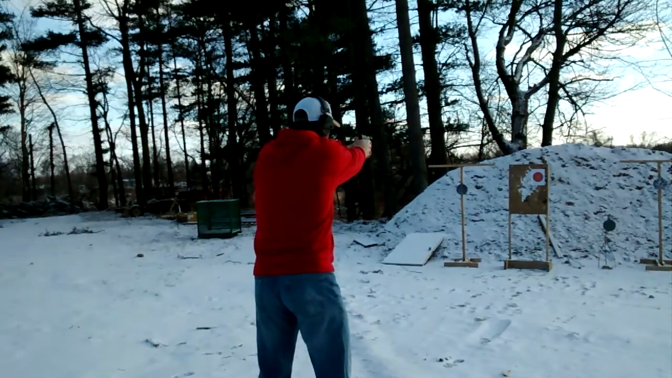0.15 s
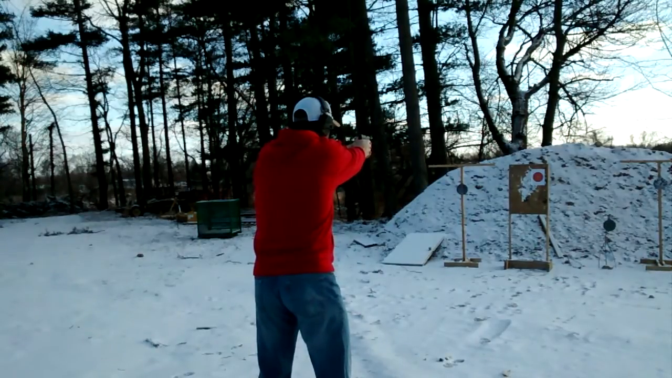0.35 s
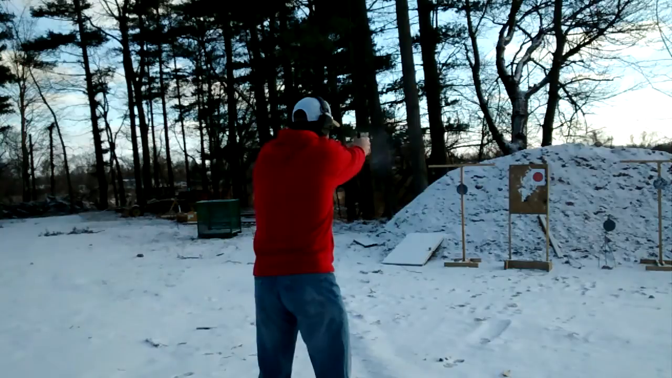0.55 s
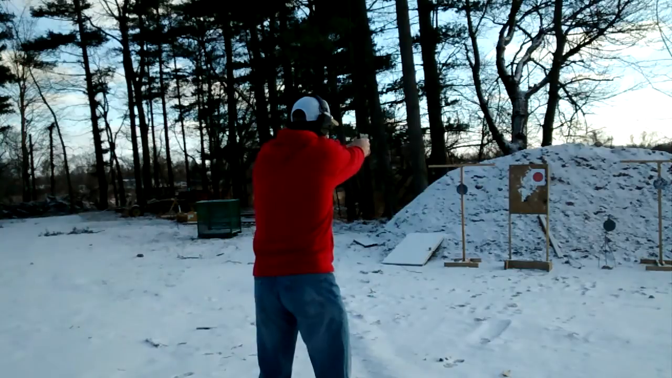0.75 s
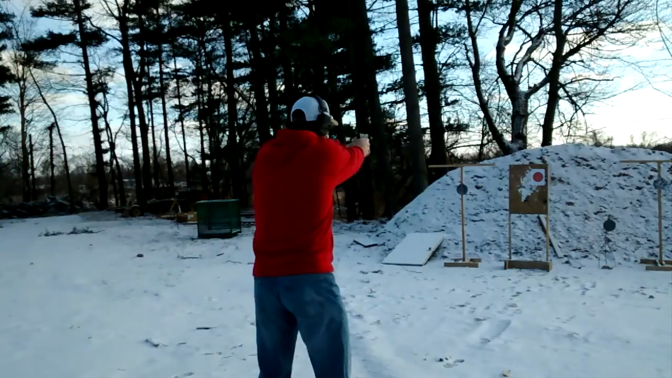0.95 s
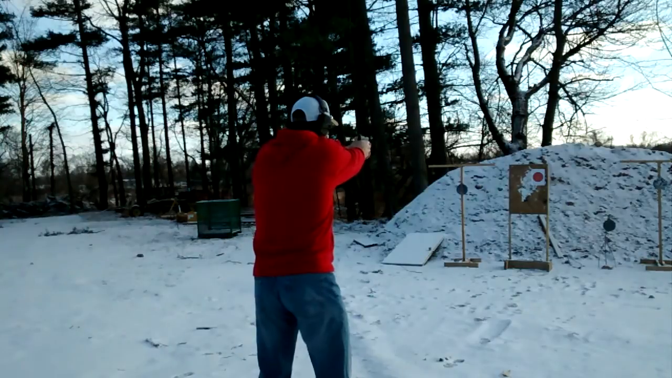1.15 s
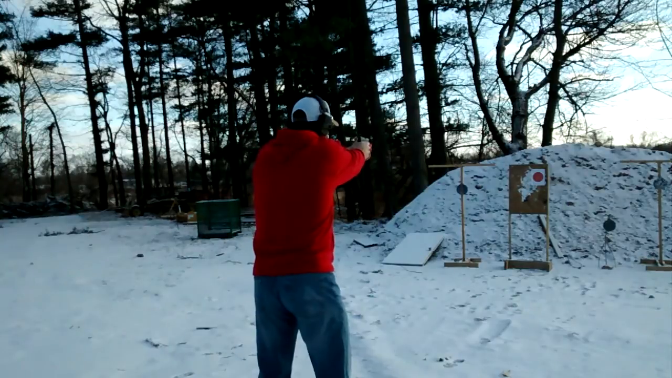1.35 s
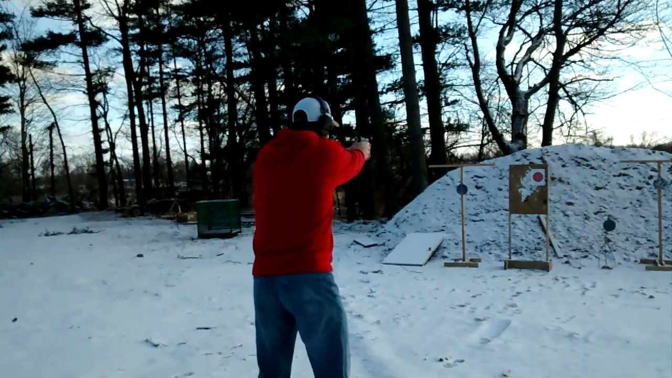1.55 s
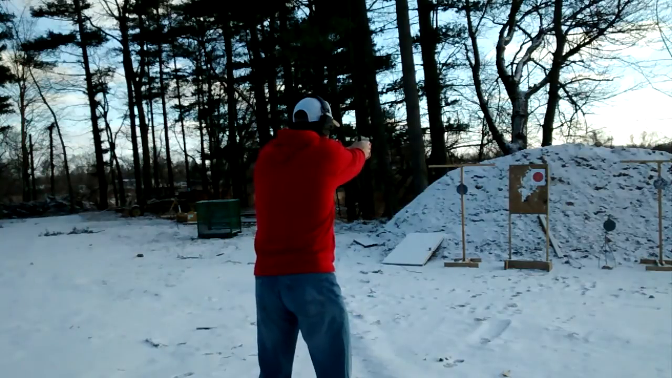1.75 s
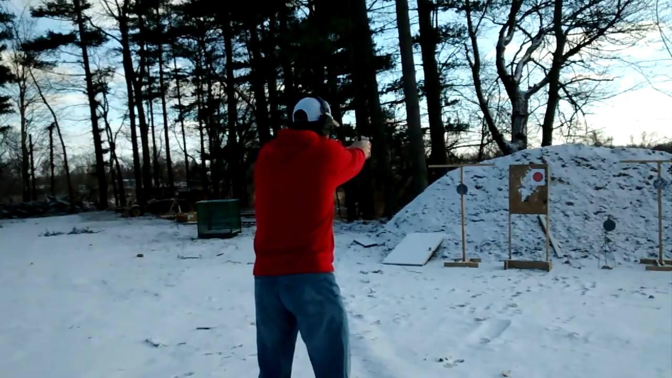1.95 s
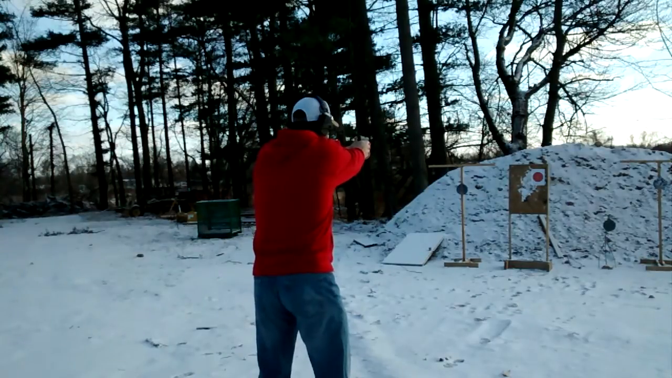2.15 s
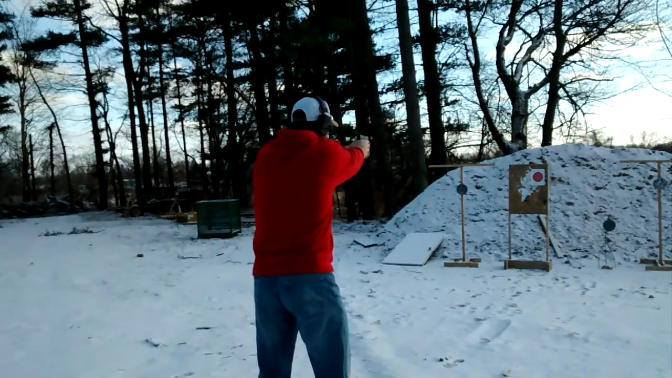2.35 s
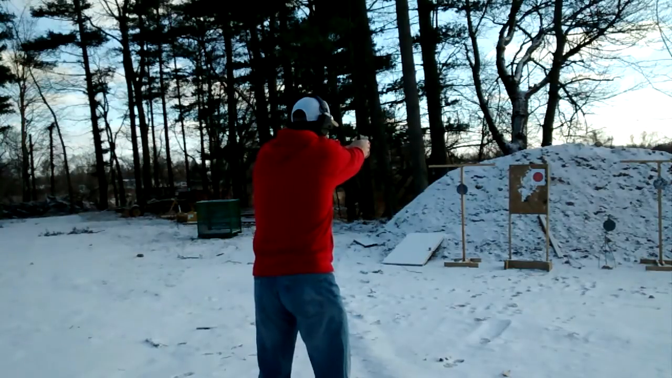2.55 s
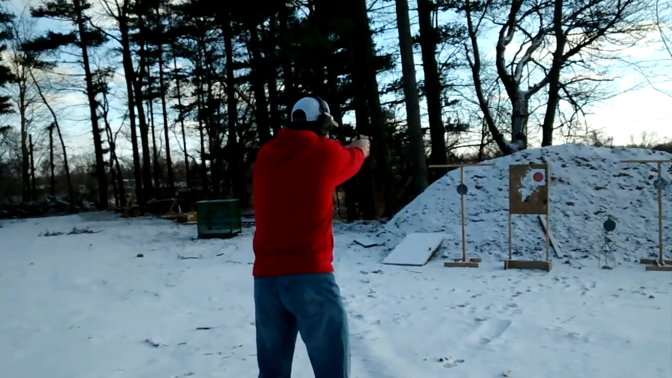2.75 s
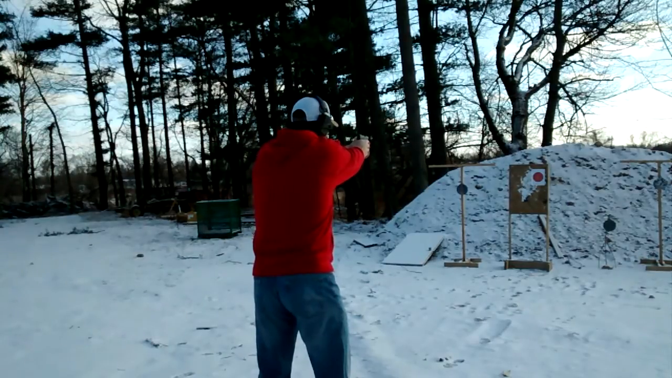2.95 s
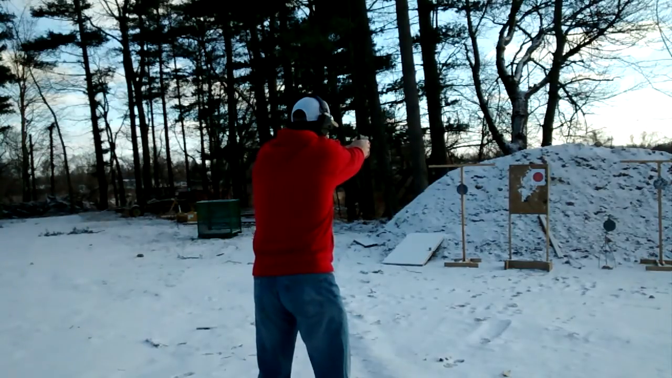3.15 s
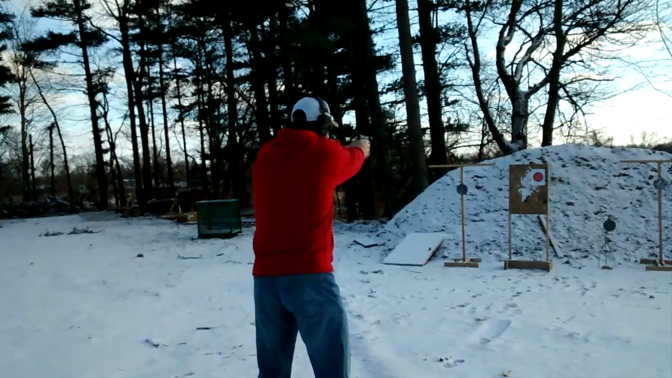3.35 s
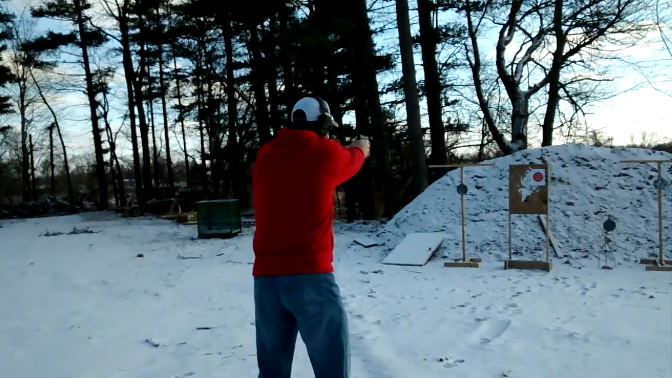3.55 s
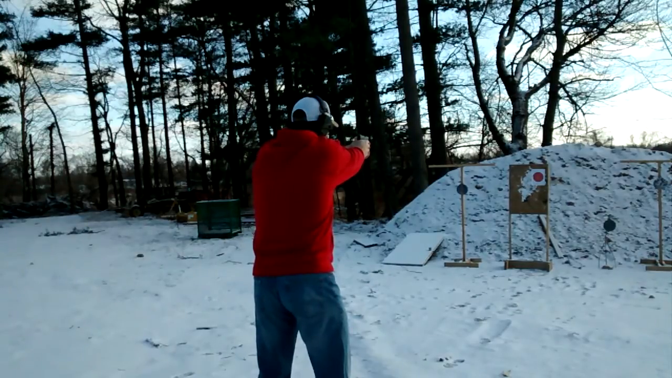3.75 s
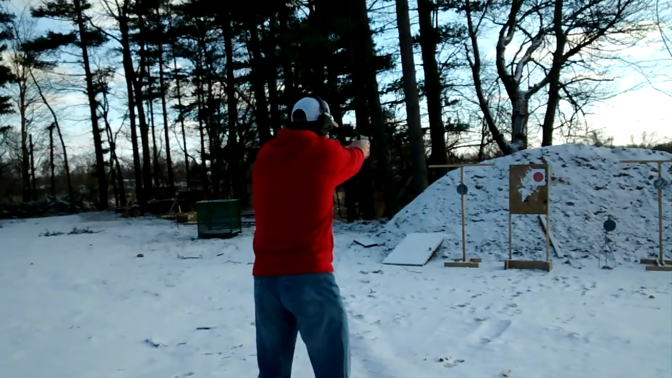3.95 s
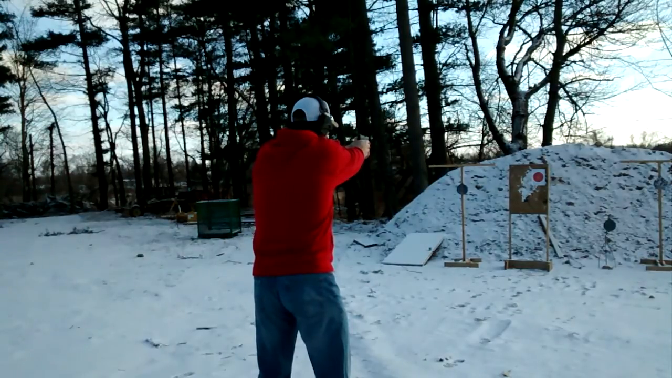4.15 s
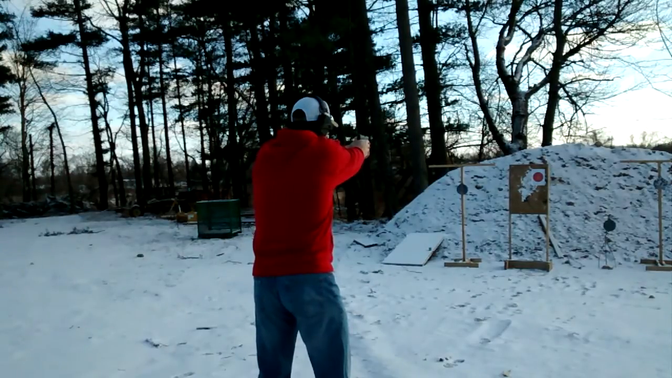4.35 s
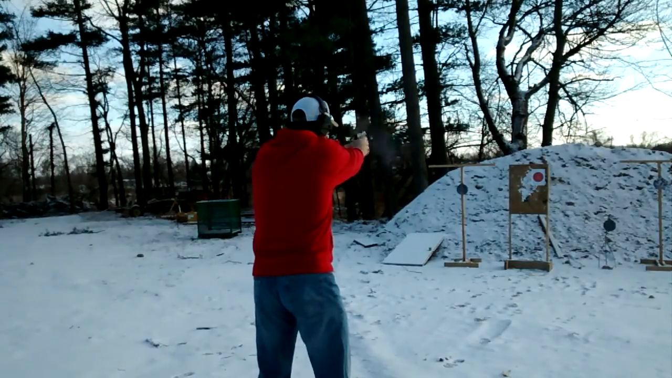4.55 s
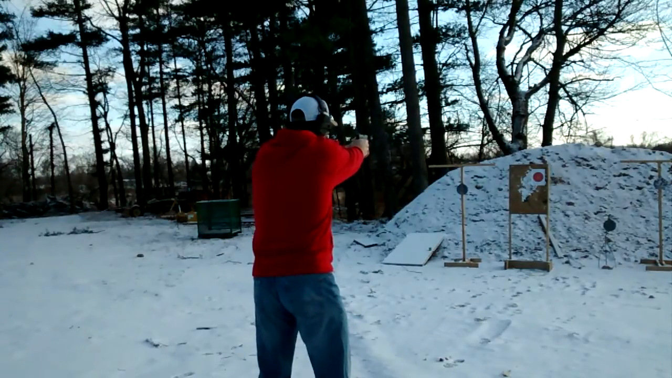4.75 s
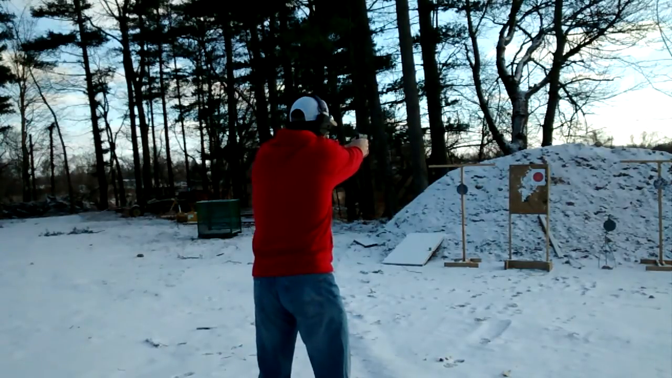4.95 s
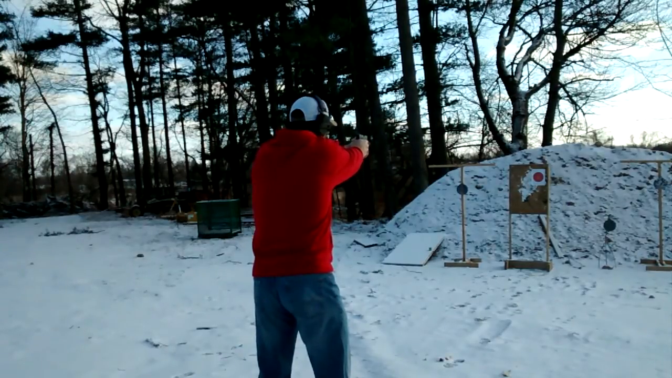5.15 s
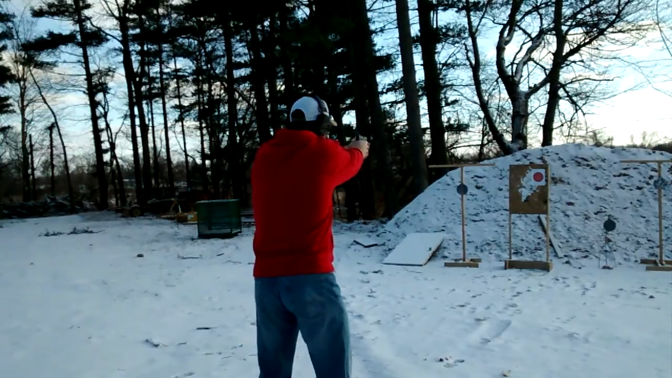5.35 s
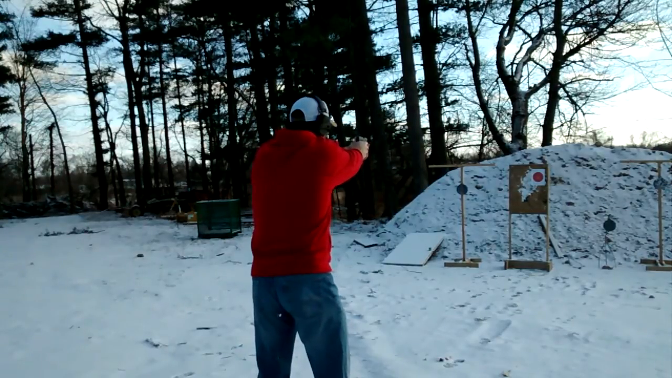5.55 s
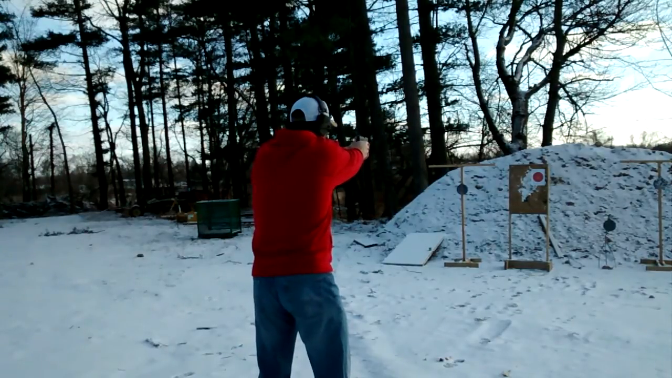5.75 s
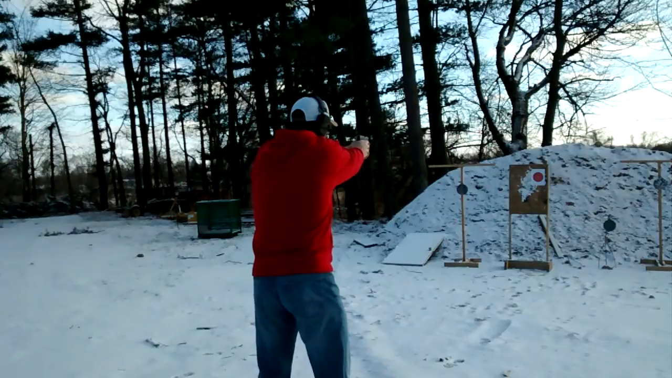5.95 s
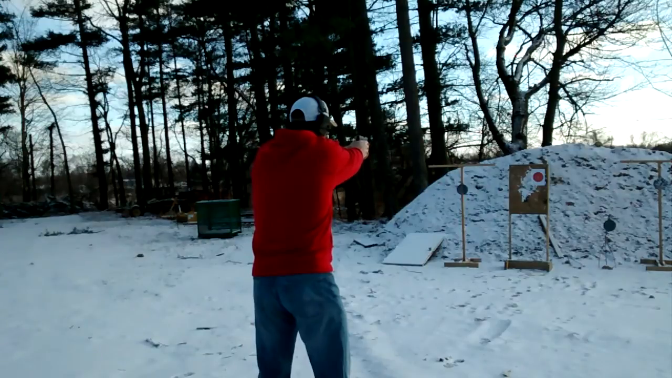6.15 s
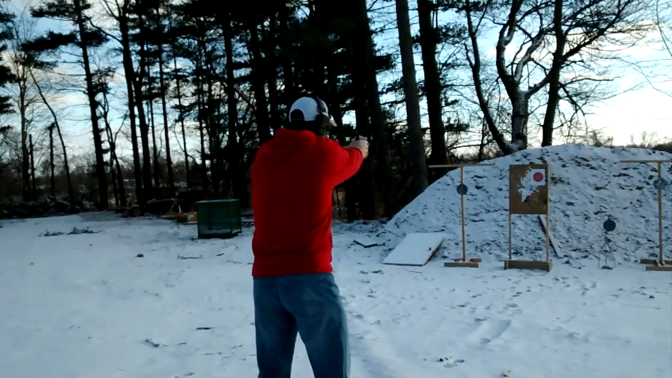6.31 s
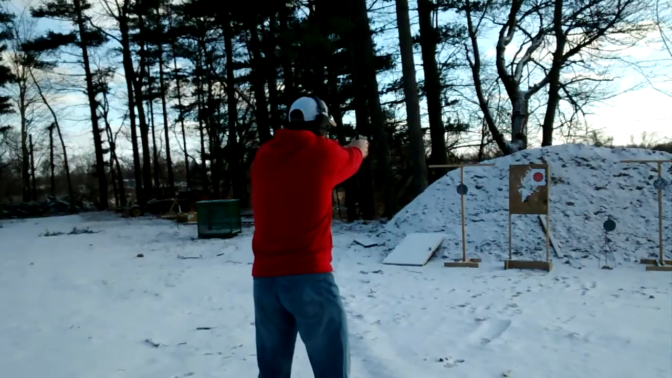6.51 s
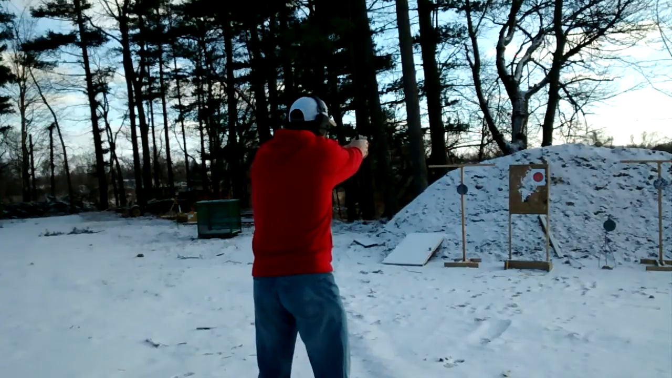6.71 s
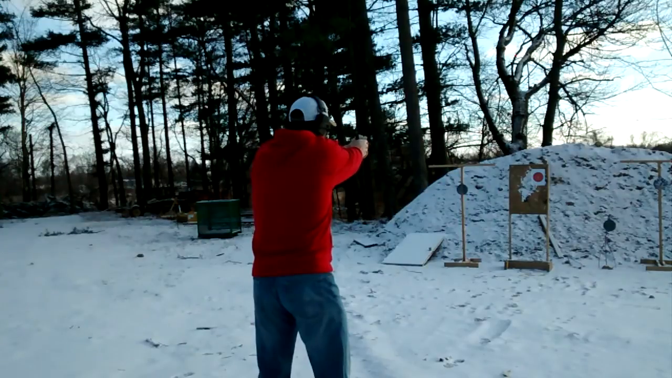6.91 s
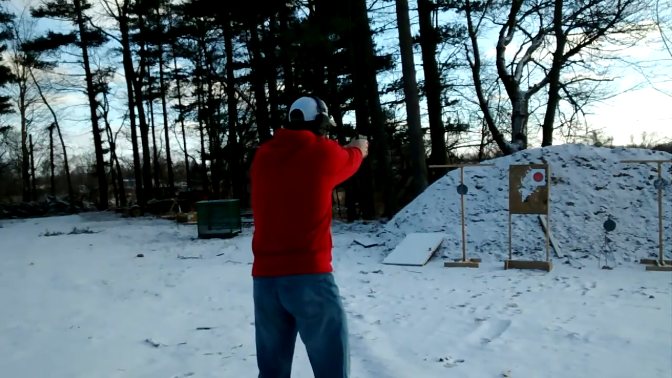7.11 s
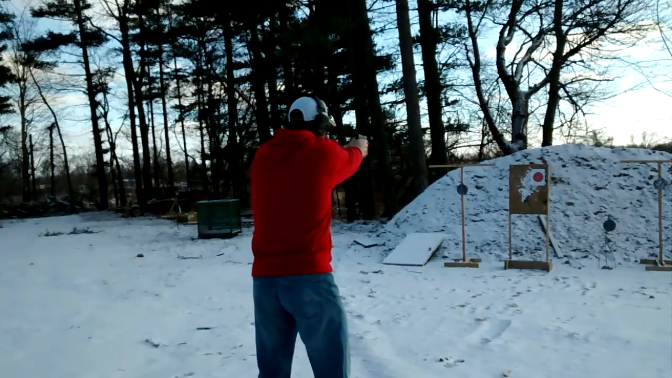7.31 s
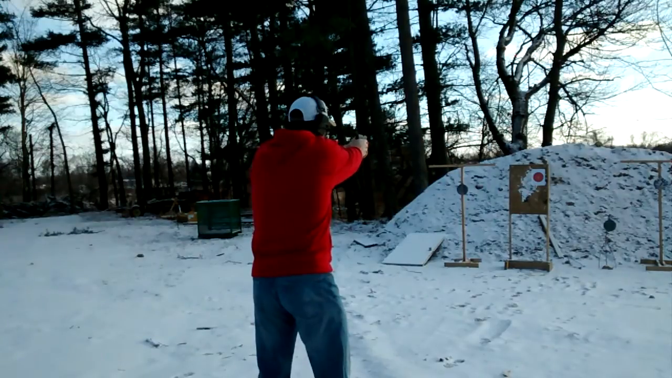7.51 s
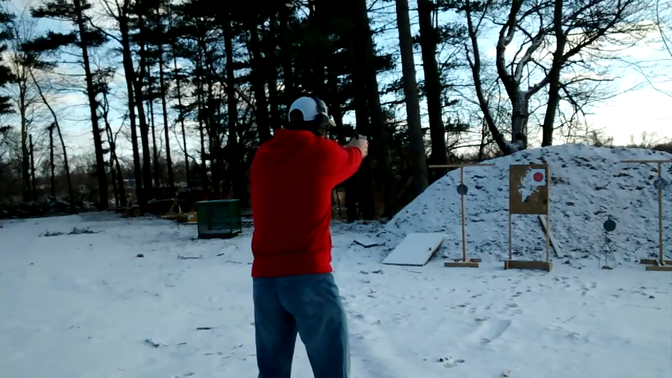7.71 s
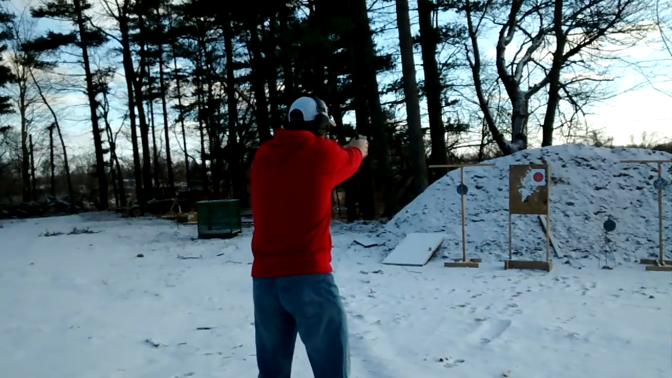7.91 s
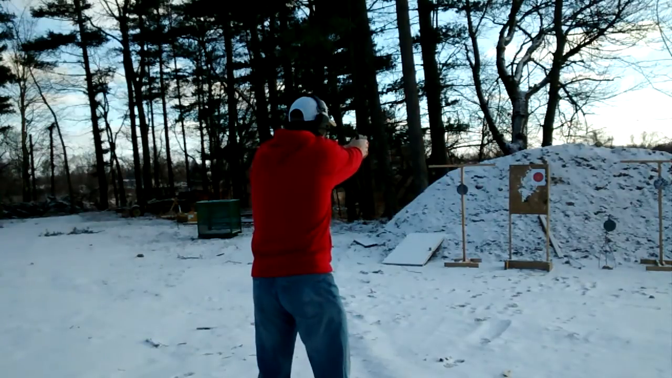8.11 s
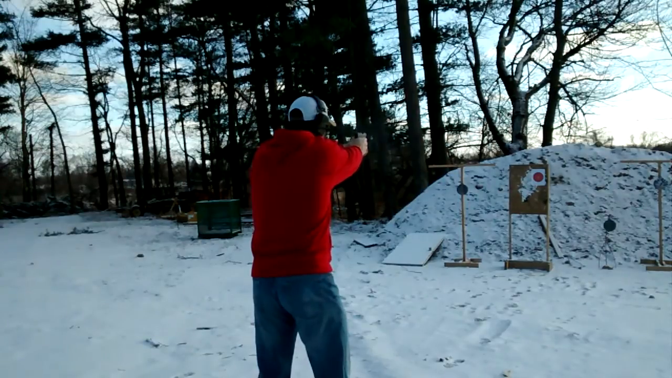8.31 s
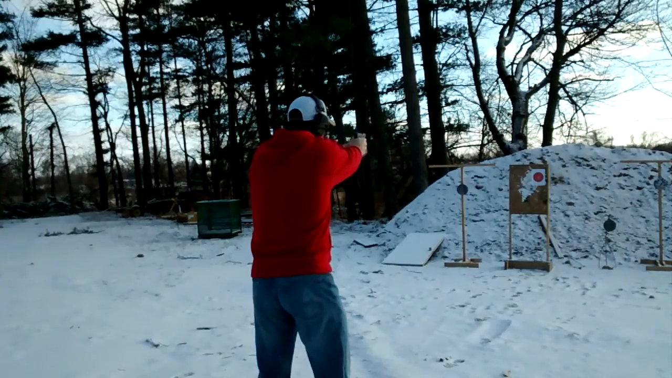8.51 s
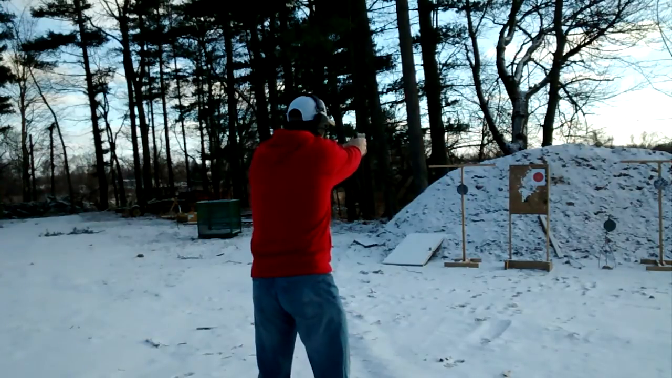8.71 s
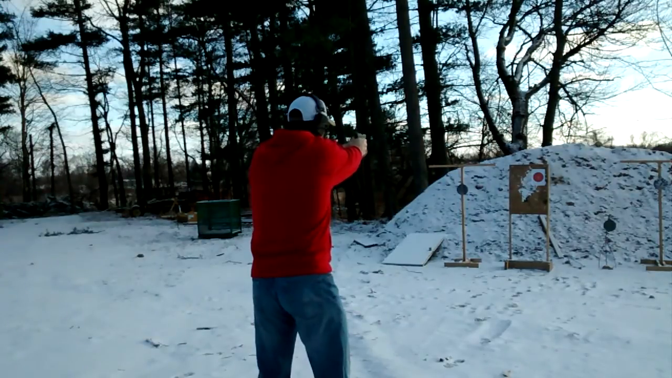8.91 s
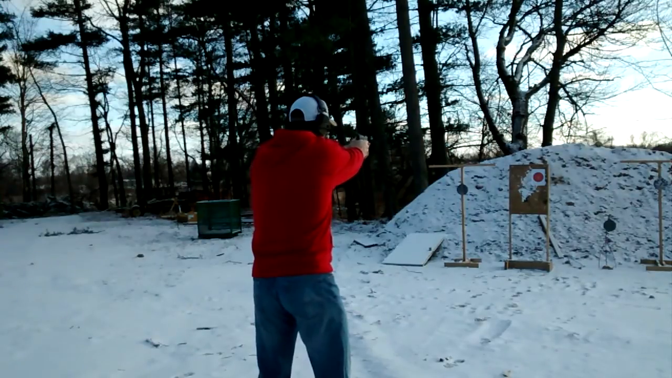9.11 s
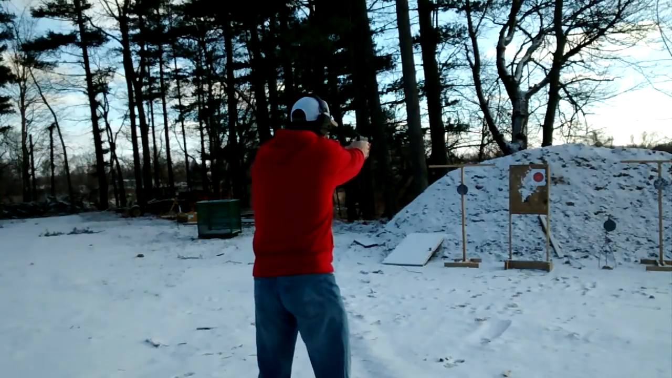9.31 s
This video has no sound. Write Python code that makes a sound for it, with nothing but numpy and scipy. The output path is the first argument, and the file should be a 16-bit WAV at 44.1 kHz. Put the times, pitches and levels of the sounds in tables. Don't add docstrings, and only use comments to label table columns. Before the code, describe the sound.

Wind rumbles low and unevenly on a camera microphone in the open, with a fluttering gust and soft thumps in the first half second. At about 0.6 s a small pistol fires a few metres away: an abrupt, clipped crack, rapid slaps from ground, bank and stands, then a rough, scattered echo through tree trunks, fading within about a second. The wind drops sharply under the automatic gain, then returns, with gusts near 2 to 2.5 s and a swell before 4 s. A small metal tick at 4.25 s precedes the second shot at 4.6 s, with the same echo pattern. Gusts bump around 5.5 s, and wind pops continue from 6.6 to 7.9 s. Another tick comes at 7.7 s, then the third, slightly softer shot at 8.3 s. Its tail dies into faint far roll and hiss, with a gust near 8.8 s and very faint tick near 9 s.

```python
import sys
import numpy as np
from scipy import signal
from scipy.fft import rfft, irfft, next_fast_len
from scipy.io import wavfile
from scipy.ndimage import uniform_filter1d, map_coordinates

SR = 44100
rng = np.random.default_rng(int(sys.argv[2]) if len(sys.argv) > 2 else 0)


def waveform_to_disk(signal):
    frames = np.transpose(np.atleast_2d(signal))
    scaled = np.clip(frames, -1, 1) * 32767
    samples = np.round(scaled).astype(np.int16)
    wavfile.write(sys.argv[1], SR, samples)


def voltage_ratio(decibels):
    exponent = np.asarray(decibels, float) / 20
    return 10 ** exponent


N = 413216
SHOT_N = int(1.6 * SR)


# (time [s], level [dB], sideways push of the overloaded ports [-1..1])
SHOTS = [
    (.5620, -0.5, .5),
    (4.5858, -0.5, 0.46),
    (8.2647, -1, 0.14),
]
# (frequency [Hz], level [dB])
PORT_TILT = [(300, 0.5), (1500, -2), (3000, -4.5), (5000, 3), (12000, 6)]


def pistol():
    out = np.zeros((2, N + SHOT_N))
    t = np.arange(SHOT_N) / SR
    near_t = t[:SR // 2]
    push_peak_s = 0.0033
    port_drift = np.array([[1], [-1]]) * (t / push_peak_s * np.exp(1 - t / push_peak_s)) ** 2
    same_trunks = scatter(lumpy_db=4, trunk_db=21)
    for s, db, push in SHOTS:
        trunks = 0.85 * same_trunks + 0.45 * scatter(lumpy_db=2.5, trunk_db=15)
        shot = wood(trunks) * (1 - np.exp(-(t / 0.006) ** 2))
        shot[:, :len(near_t)] += echoes(near_t) + rattles(near_t)
        shot += push * port_drift
        out[:, round(s * SR):][:, :SHOT_N] += voltage_ratio(db) * shot
    return filtered(out[:, :N], lambda hz: voltage_ratio(np.outer([0.5, -0.5], along(PORT_TILT, hz))))


def blast(t, hz):
    u = np.clip(t * hz, 0, None)
    return (u / 0.66 * np.exp(1 - u / 0.6)) ** 2.2 * np.sin(2 * np.pi * u)


def echoes(t):
    out = np.zeros((2, len(t)))
    for delay, db, lag_ms, hz, edge_db in reflectors():
        arrival = delay + np.array([[lag_ms], [-lag_ms]]) / 2000
        pulse = blast(t - arrival, hz) + voltage_ratio(edge_db + 2.0) * blast(t - arrival, hz=2900)
        out += voltage_ratio(db + rng.normal(0, 1.0)) * pulse
    return out


# (time after shot [s], level
# [dB], left lag [ms], pitch [Hz], edge level [dB])
ECHOES = [(.0006, 9, -0.1, 936, 4), (.0012, -2.5, 0, 267.6, -20.5), (.0036, 7.5, -0.18, 791, -4.5),
          (.0062, -18, -.1, 700, -10), (.0085, -7, -.25, 604.6, -11.5), (0.0265, -14.5, 0.29, 701, -7.5),
          (.0314, -14.5, 0.27, 700, -5.5), (0.0405, -3.5, 0.39, 601, -12.5), (.0456, -16, .36, 601.7, -22),
          (0.0491, -10.5, -.12, 941, -14), (0.0503, 3.5, -0.17, 776.5, -16),
          (.0767, -17.5, -0.37, 1105, -4), (.0894, -16, -0.2, 890.3, -9.5),
          (0.1167, -12, -0.29, 490.6, -11), (.1970, -13.5, .02, 930, -24.5), (0.3001, -19, .1, 860, -21.5)]
# (time after shot [s], level [dB], left lag [ms])
TRUNKS = [(0.0985, -17, -0.021), (0.1194, -21, -.1), (.1222, -18.5, -0.018), (0.1355, -25.5, .05),
          (0.1475, -31, -0.12), (.1587, -19, -0.067), (0.179, -22, .02), (.2156, -25, -0.074),
          (.2536, -36, 0.085), (0.2755, -24, -0.05), (0.3066, -21.5, .13), (.3213, -22, .05),
          (0.4542, -28, 0.2)]


def reflectors():
    trunk_hz, edge_db, edge_loss_db_per_s = 748, -37, 59
    far = [(s, db, lag, trunk_hz, edge_db - edge_loss_db_per_s * s - db) for s, db, lag in TRUNKS]
    return ECHOES + far


# (time after shot [s], swell [s], level [dB], centre [Hz], width [Hz])
RATTLES = [(.0005, .0006, 9, 2404, 1894), (.0005, 0.00068, -1, 6500, 6923), (.0044, .0006, -2, 2166, 3460),
           (.0060, .003, -21, 2025, 2986), (0.025, .0025, -19, 3072, 1973), (.0498, .0006, -23, 4985, 5070),
           (.0525, .0025, -22, 2900, 1987), (0.0578, .0013, -31, 5540, 7040),
           (.1050, .001, -28.5, 2600, 1600), (.1195, .002, -30, 2606, 2058), (.1290, .002, -34, 3330, 2014),
           (.3050, .0015, -41, 2600, 2470)]


def rattles(t):
    out = np.zeros((2, len(t)))
    for delay, swell_s, db, hz, width_hz in RATTLES:
        def band(f):
            return (1j * f * width_hz / (hz * hz - f * f + 1j * f * width_hz)) ** 2
        gas = filtered(rng.standard_normal((2, len(t))), band)
        age = np.clip(t - delay, 0, None) / swell_s
        out += voltage_ratio(db) * (age * np.exp(1 - age)) ** 2 * unit(gas)
    return out


# (time after shot [s], level [dB])
WOOD = [(0, -21.5), (.07, -27.5), (.16, -30), (.18, -34.5), (.3, -36), (.5, -45.5), (.8, -54.5), (1.3, -60),
        (1.6, -103)]
# (frequency [Hz], level [dB per Hz])
WOOD_COLOUR = [(50, -28), (200, -5), (400, 1.5), (900, 1), (1500, -6.5), (2000, -12.5), (2500, -2),
               (3200, -11.5), (5000, -14.5), (7000, -18), (9000, -26.5), (15000, -39)]
# (frequency [Hz], loss [dB/s])
WOOD_LOSS = [(300, 8.5), (1000, -1), (2500, 5.5), (4000, 14.5), (7000, 29.5), (10000, 55), (15000, 94.5)]
# (frequency [Hz], correlation [-1..1])
WOOD_ALIKE = [(100, 1), (400, 0.85), (800, 0.19), (1500, 0.046), (2500, .6), (4000, .1)]


def wood(trunks):
    spread = coloured(trunks, WOOD_COLOUR, WOOD_ALIKE)
    hz, t, z = signal.stft(spread, SR, nperseg=256)
    fall_db = np.interp(t, *np.transpose(WOOD)) - along(WOOD_LOSS, hz)[:, None] * t
    patches_db = 3 * unit(uniform_filter1d(rng.standard_normal(z.shape[1:]), size=9, axis=0))
    return signal.istft(z * voltage_ratio(fall_db + patches_db), SR, nperseg=256)[1][:, :SHOT_N]


def scatter(lumpy_db, trunk_db):
    t = np.arange(SHOT_N) / SR
    smoothing_s, thinning_db_per_s, trunks_per_s = 0.38, 22.5, 130
    lumps_db = lumpy_db * np.exp(-t / smoothing_s) * wobble(250, count=SHOT_N)[0]
    dense = rng.standard_normal((2, SHOT_N)) * voltage_ratio(lumps_db)
    hits = rng.random((2, SHOT_N)) < trunks_per_s / SR
    single = hits * rng.uniform(-2.5, 1, (2, SHOT_N))
    return unit(dense + voltage_ratio(trunk_db - thinning_db_per_s * t) * single)


# (time [s], wind level [dB], flutter over buffet [dB])
WIND = [(0, -22.5, -8), (.3, -26, -4), (.55, -27.5, -10), (1.2, -28, -6.5), (1.9, -30, -8),
        (2.2, -30.5, -15), (2.5, -30, -9.5), (2.9, -30, -4), (3.3, -28.5, -13), (3.85, -23.5, -13),
        (4.1, -34, -10), (4.28, -41.5, -8.5), (4.4, -22.5, -14), (4.6, -23, -9), (6.1, -32, -6),
        (6.8, -30, -5.5), (8.249, -26.5, -9), (8.7, -41.5, -14)]
# (frequency [Hz], level [dB per Hz])
BUFFET = [(10, -10.5), (30, 11.5), (130, 9.5), (200, -2), (300, -42), (500, -120)]
# (frequency [Hz], level [dB per Hz])
FLUTTER = [(100, -39.5), (150, -0.5), (200, -0.5), (300, -6), (500, -17.5), (1000, -41.5), (1600, -53),
           (3000, -120)]


def wind():
    s, *controls = np.transpose(WIND)
    t = np.arange(N) / SR
    level_db, bright_db = np.array([np.interp(t, s, c) for c in controls]) + gusts()
    lumps = wobble(22)
    rumble = coloured(rng.standard_normal((2, N)), BUFFET, [(50, -0.0093)])
    buffet = steady(voltage_ratio(3.3 * lumps) * rumble)
    rustle = coloured(rng.standard_normal((2, N)), FLUTTER, [(300, 0.029)])
    flutter = steady(voltage_ratio(5.1 * lumps + 3.1 * wobble(60)) * rustle)
    cut_db = -25.5
    cut = since_shot([(0, 0), (0.03, cut_db + 10), (0.31, cut_db), (0.58, cut_db + 4), (1.91, 0)])
    return cut * voltage_ratio(level_db - 1.58) * (buffet + voltage_ratio(bright_db + 2.0) * flutter)


# (time [s], swell [dB], half length [s], flutter change [dB])
GUSTS = [(0, 5, 0.089, -4), (0.172, 0, 0.068, -6.5), (0.299, -10, 0.015, 6.5), (0.372, 8.5, 0.04, 2),
         (1.967, 11, 0.029, 6), (2.058, 13.5, 0.044, -2), (2.23, -1.5, .08, 8), (2.31, 3.5, 0.06, 2),
         (2.431, 8.5, .05, 0.5), (2.851, 0.5, .06, -3), (2.96, -6.5, .06, 5.5), (3.207, 2, 0.085, -4),
         (3.935, -5, 0.14, 0), (4.16, 6, 0.027, -11), (4.222, 11, 0.021, -11), (4.34, -0.5, 0.062, -0.5),
         (4.376, 6.5, 0.06, -1), (4.499, 11.5, 0.031, 2.5), (5.356, 7.5, 0.031, -1.5),
         (5.544, 15.5, 0.047, -6.5), (5.628, 7, 0.098, 11.5), (6.248, 3, 0.058, -2.5),
         (6.72, -0.5, 0.12, 3), (6.895, 6, 0.093, -0.5), (7.23, -2, 0.19, -5.5), (7.59, 2.5, 0.072, -4.5),
         (7.792, 3, 0.11, 4), (8.012, 0, 0.045, -8), (8.79, 11.5, 0.13, -5), (9.3, -3, 0.086, 4)]


def gusts():
    out, t = np.zeros((2, N)), np.arange(N) / SR
    for s, swell_db, half_s, flutter_db in GUSTS:
        span = slice(max(round((s - half_s) * SR), 0), round((s + half_s) * SR))
        out[:, span] += np.outer([swell_db, flutter_db], 1 - np.abs(t[span] - s) / half_s)
    return out


# (time [s], peak above 500 Hz [dB], left-right [dB], pitch [Hz])
POPS = [(0.068, -35.5, -3.5, 515), (0.371, -30, -12, 470), (1.766, -39.5, -3, 2200), (1.957, -47.5, 0, 520),
        (2.434, -37.5, 0.5, 523), (3.793, -43, -1.5, 526), (4.506, -31, -5.5, 533), (6.655, -39, -6, 510),
        (6.697, -39.5, -3.0, 502), (7.051, -30.5, -3.5, 490), (7.883, -36, -4.5, 520),
        (7.918, -32.5, 23, 504), (8.78, -42, 1, 2800), (9.303, -44, 2, 602)]


def pops():
    out, t = np.zeros((2, N + SR)), np.arange(SR // 20) / SR
    for s, db, pan_db, hz in POPS:
        port = int(pan_db < 0)
        out[port, round(s * SR):][:len(t)] += voltage_ratio(db + 8.5) * blast(t, hz)
    return out[:, :N]


# (time [s], peak [dB], left-right [dB], t60 share, pitch share)
TICKS = [
    (4.2530, -32, -9.5, 0.45, 1.03),
    (5.3600, -55, -2, .4, 1.3),
    (7.6691, -33, 1, .45, 1.0),
    (9.0385, -54, -1.5, .4, 1.2),
]
# (frequency [Hz], level [dB], t60 [s])
TICK_MODES = [(1720, -11, .024), (1895, -5, .028), (2350, 6, .017), (2900, -3, .012), (5600, -11, .018),
              (8700, -14, .012), (13600, -19, .016)]


def ticks():
    out, t = np.zeros((2, N + SR)), np.arange(SR // 20) / SR
    for s, db, pan_db, t60_share, pitch in TICKS:
        for wait_s, hit_db in ((0, 0), (0.003, -2.5)):
            ring = np.zeros(len(t))
            for hz, level_db, t60_s in TICK_MODES:
                decay = voltage_ratio(level_db + rng.normal(0, 1.1) - 60 * t / (t60_s * t60_share))
                ring += decay * np.sin(2 * np.pi * (hz * pitch * t + rng.random()))
            ring *= 1 - np.exp(-t / 0.0003)
            ring += voltage_ratio(-4 - 60 * t / 0.014) * uniform_filter1d(rng.standard_normal(len(t)), size=5)
            for port, late_n, side_db in ((0, 0, pan_db / 2), (1, 6, -pan_db / 2)):
                start = round((s + wait_s) * SR) + late_n
                out[port, start:][:len(t)] += voltage_ratio(db + hit_db + 1.0 + side_db) * ring
    return out[:, :N]


# (time after shot [s], level [dB])
ROLL = [(0, -46.5), (1, -56.5), (1.7, -52.5), (2.3, -57), (3, -56), (3.7, -58)]
# (frequency [Hz], level [dB per Hz])
DISTANCE = [(150, -6), (300, -9), (500, 7.5), (900, 2), (1400, -14.5), (2500, -17), (5000, -48.5)]
# (time after shot [s], gain [dB])
DUCK = [(0, -10.5), (1.4, -11.5), (2.1, -10), (2.85, -3.5)]
# (frequency [Hz], level [dB per Hz])
HISS = [(300, 5), (3000, 4), (5000, 3.5), (8000, 2), (16000, 0)]


def background():
    roll = coloured(rng.standard_normal((2, N)), DISTANCE, [(300, 0.82), (1000, 0.023)])
    roll = voltage_ratio(0.75 * wobble(2.8)[0]) * roll
    hiss = voltage_ratio(-54.5) * coloured(rng.standard_normal((2, N)), HISS, [(1000, 0.01)])
    return since_shot(ROLL) * roll + since_shot(DUCK) * hiss


def since_shot(points):
    t = np.arange(N) / SR
    times = np.array([-60] + [s for s, *_ in SHOTS])
    latest = times[np.searchsorted(times, t) - 1]
    return voltage_ratio(np.interp(t - latest, *np.transpose(points)))


def unit(x):
    return x / np.sqrt(np.mean(x ** 2) + 1e-20)


def along(points, hz):
    f, v = np.transpose(points)
    return np.interp(np.log(hz + 1), np.log(f + 1), v)


def filtered(x, response):
    m = next_fast_len(x.shape[-1] + 4096)
    spectrum = rfft(x, m) * response(np.fft.rfftfreq(m, 1 / SR))
    return irfft(spectrum, m)[..., :x.shape[-1]]


def coloured(pair, spectrum, alike):
    def mid_side(hz):
        turn = np.arccos(np.clip(along(alike, hz), -1, 1)) / 2
        return voltage_ratio(along(spectrum, hz)) * [np.cos(turn), np.sin(turn)]
    mid, side = filtered(pair, mid_side)
    return unit(np.array([mid + side, mid - side]))


def wobble(rate, count=N):
    knots = rng.standard_normal((2, int(count * rate / SR) + 4))
    return np.array([map_coordinates(k, [np.arange(count) * rate / SR]) for k in knots])


def steady(pair):
    power = (pair[0] - pair[1]) ** 2 / 2
    power = uniform_filter1d(uniform_filter1d(power, size=2000), size=2000)
    return pair / np.sqrt(np.abs(power) + 1e-9)


def scene():
    return pistol() + wind() + pops() + ticks() + background()


def low_pass(x):
    return signal.sosfilt(signal.butter(12, 16200, fs=SR, output="sos"), x)


# (frequency [Hz], share [0..1])
CROSSFEED = [(100, .67), (1300, .5), (2100, .66), (2500, .74), (2900, .64), (3700, .5), (4800, .4),
             (8000, .22), (15000, .1)]


def record(dry):
    cross_delay_s, top_hz = 0.0004018, 15830
    cross = filtered(dry[::-1], lambda hz: along(CROSSFEED, hz) * np.exp(-2j * np.pi * hz * cross_delay_s))
    overloaded = np.clip(dry - cross, -1, 1)
    mix = filtered(overloaded, lambda hz: np.clip((top_hz - hz) / 250, 0, 1))
    return low_pass(mix)


dry = scene()
out = record(dry)
waveform_to_disk(out)
```